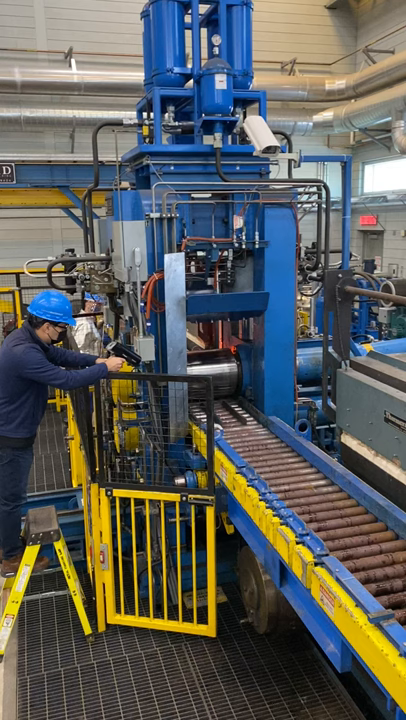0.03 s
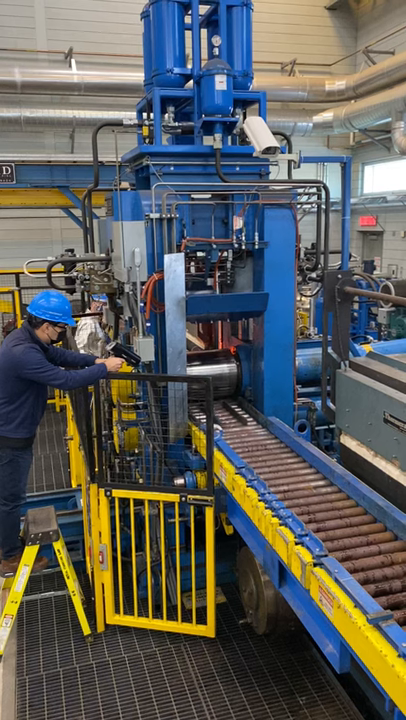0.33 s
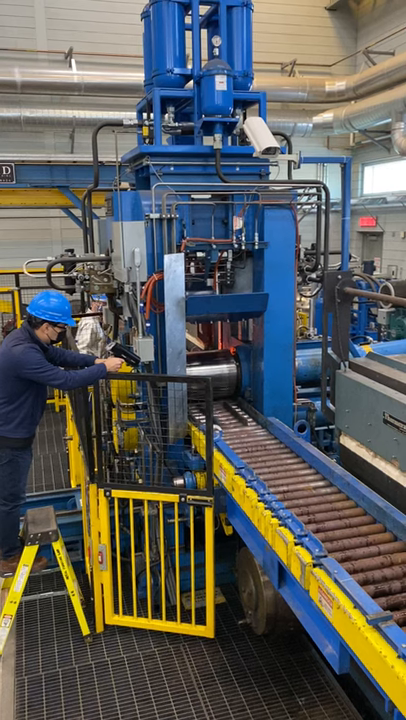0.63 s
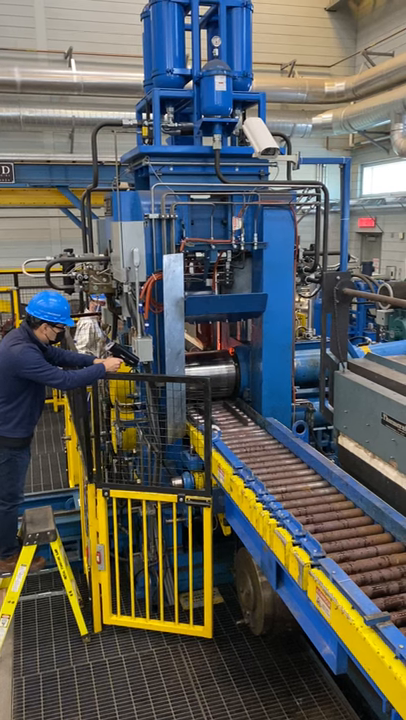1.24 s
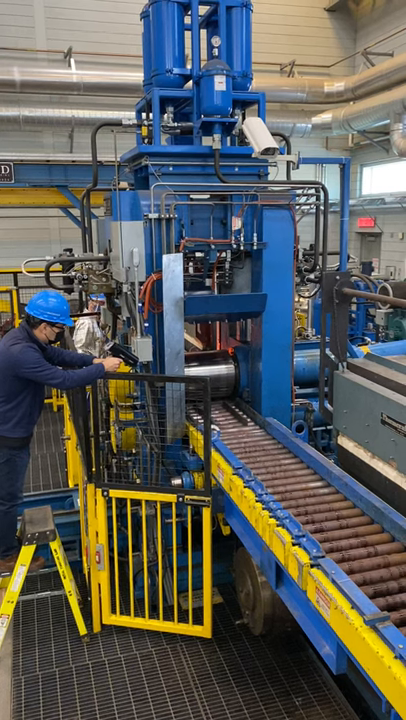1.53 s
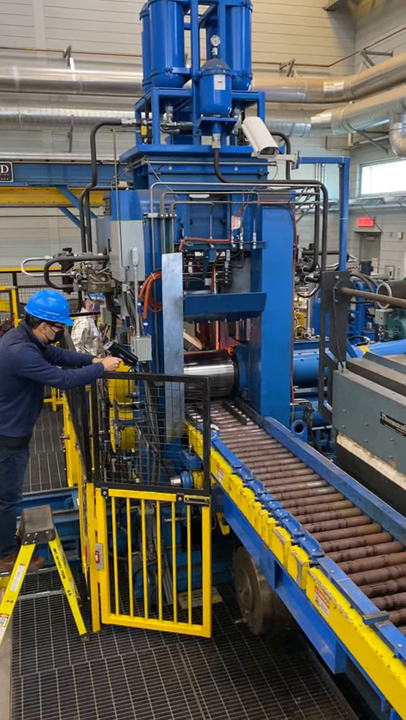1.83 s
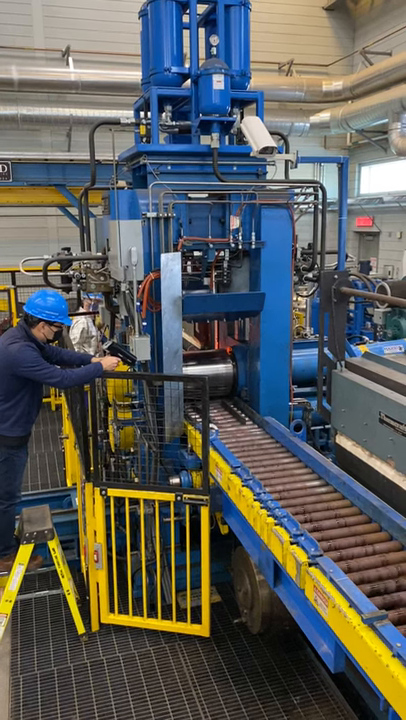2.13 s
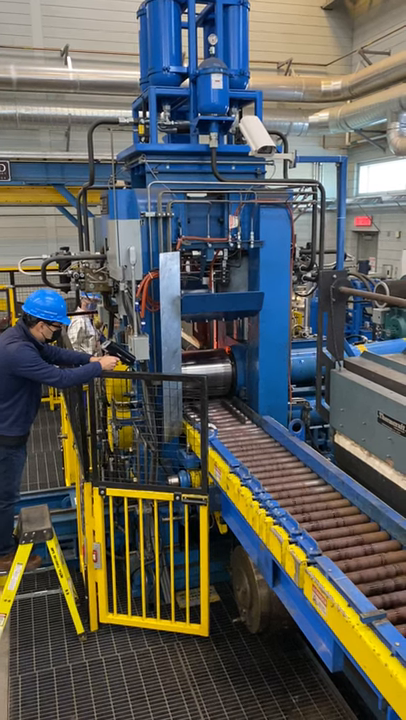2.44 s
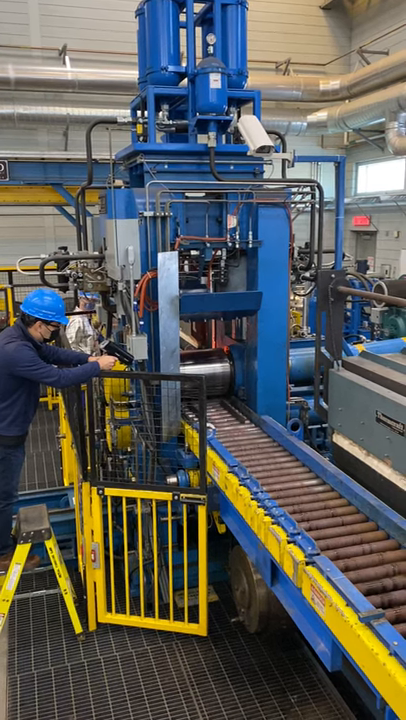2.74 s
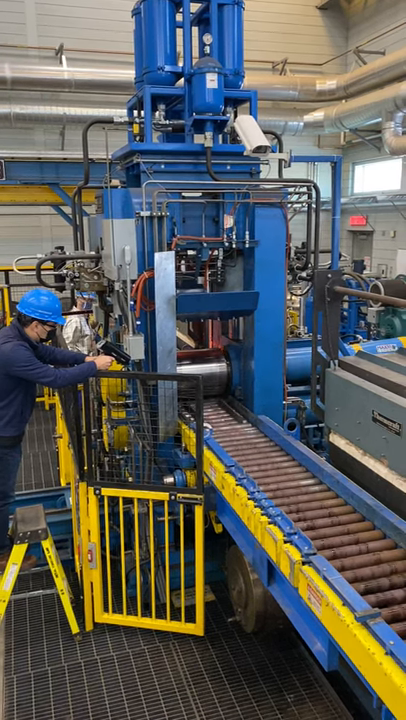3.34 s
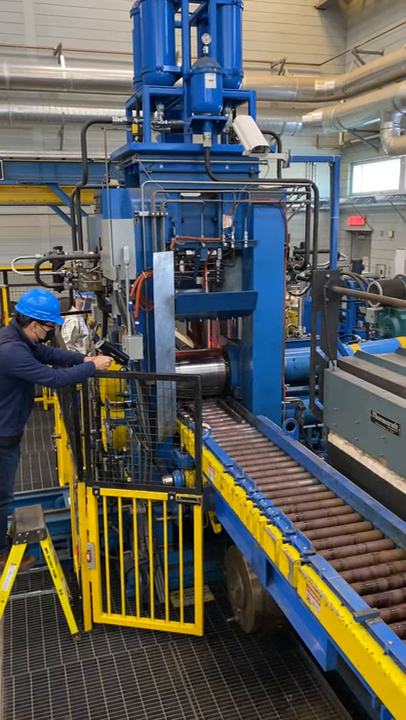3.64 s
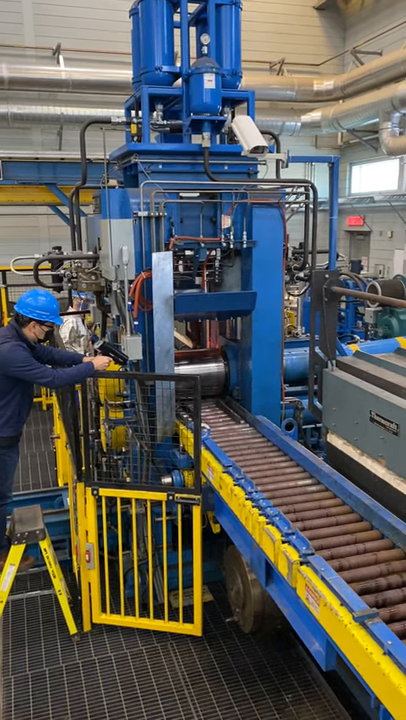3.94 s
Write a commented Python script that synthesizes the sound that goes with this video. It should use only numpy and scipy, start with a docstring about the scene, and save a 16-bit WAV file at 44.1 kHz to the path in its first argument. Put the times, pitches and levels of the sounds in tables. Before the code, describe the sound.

A rolling mill roars and rumbles in a large hall, with dull thuds and faint squeals.

```python
"""In a large steel hall, a rolling mill runs over the steady roar of the plant and a hiss of spray.
A hydraulic pump whines and motors hum. The rolls rumble and the roller table rattles, both swelling
and easing with the mill's effort. The steel strip scrapes faintly in its guides, rubbing steel gives
some raspy squeals, and the loaded frame thuds dully. Two closely spaced microphones listen."""
import sys
import numpy as np
from scipy import signal
from scipy.fft import rfft, irfft
from scipy.io import wavfile

SR = 44100
rng = np.random.default_rng(int(sys.argv[2]) if len(sys.argv) > 2 else 0)


def wav_record(signal):
    """Record a signal, one row per channel, as 16-bit PCM in the file named by sys.argv[1]."""
    frames = np.transpose(np.atleast_2d(signal))
    bounded = np.clip(frames, -1, 1)
    # unit amplitude maps onto the largest positive 16-bit level
    quanta = np.round(bounded * 32767).astype(np.int16)
    wavfile.write(sys.argv[1], SR, quanta)


N = 176400
TIME, FREQS = np.arange(N) / SR, np.maximum(np.arange(N // 2 + 1) * SR / N, 1)
CENTRE = [[1], [0]]   # sounds have two rows: what left and right share, and how they differ

# How hard the mill works. Each row: time in seconds, level in dB.
MILL_EFFORT = [(0, -22.5), (.8, -10), (1.35, -14.5), (1.7, -6.5), (2.0, -3), (2.2, -1), (2.55, -1.4),
               (2.92, 0), (3.3, -3), (3.7, -6.5), (4, -9.5)]
# How the two microphones compare. Each row: frequency in Hz, likeness from 0 to 1,
# how far left is ahead in radians, how much louder left is in dB.
MIC_PAIR = [(100, 0.95, -0.5, -6), (250, 0.95, -0.33, 0.5), (500, 0.84, 0.25, -0.6), (1070, 0.65, 0.22, 0),
            (1940, 1, 0.52, -0.7), (3080, 0.35, 0.8, -0.3), (3930, 0.85, -0.1, -3.5),
            (4220, 0.97, 1.18, -2), (4940, 0.9, 0.42, 0), (6825, 1, 2.5, 1), (10040, 1, 6, 0.5),
            (13100, 1, 8.5, -0.5), (15600, 0.8, 11.5, 1)]


def from_db(db):
    """Turn decibels into a number to multiply by."""
    return 10 ** (np.asarray(db) / 20)


def rms_one(x):
    """Scale a signal so that its average strength (rms) is 1."""
    return x / np.sqrt(np.mean(np.abs(x) ** 2) + 1e-20)


def in_time(rows, lag_s=0):
    """Join rows of time and value into a curve."""
    return np.interp(TIME - lag_s, *np.transpose(rows))


def at_hz(rows, hz, column=1):
    """Read a table between its frequencies, with octaves evenly spaced."""
    rows = np.array(rows)
    return np.interp(np.log(hz), np.log(rows[:, 0]), rows[:, column])


def drift(rate_hz):
    """A smooth random wobble, about 1 in size."""
    step, warm_up = 40, 2000
    memory = np.exp(-2 * np.pi * step * rate_hz / SR)
    noise = rng.standard_normal(N // step + warm_up + 2)
    slow = signal.lfilter([1], [1, -2 * memory, memory * memory], noise)[warm_up:]
    return np.interp(np.arange(N) / step, np.arange(len(slow)), rms_one(slow))


def narrow_noise(phase, width_hz):
    """Noise gathered closely around one pitch."""
    return drift(width_hz) * np.cos(phase) + drift(width_hz) * np.sin(phase)


def roar(spectrum, level_db, flicker_db, flicker_hz):
    """Two noises cut into octave bands; each band flickers around level_db(its frequency)."""
    noise = rfft(rng.standard_normal((2, N))) * from_db(at_hz(spectrum, FREQS)) * np.sqrt(SR / 2)
    octave = np.clip(np.round(np.log2(FREQS)), 6, 13)
    out, together = 0, drift(flicker_hz)
    for k in np.unique(octave):
        flicker = flicker_db * (drift(flicker_hz) + .5 * together)
        out = out + irfft(noise * (octave == k), N) * from_db(level_db(2 ** k) + flicker)
    return out


def hall(x, fade_s=1.2):
    """The hall's echo: two tails of noise that fall 60 dB in fade_s."""
    tails = rng.standard_normal((2, SR)) * from_db(-60 * TIME[:SR] / fade_s)
    return signal.fftconvolve(x[None], rms_one(tails) / np.sqrt(SR), axes=1)[:, :N]


def tone(hz, db, waver_db, scattered_share=0.42):
    """A machine tone: partly pure, partly scattered by the hall."""
    phase = 2 * np.pi * (hz * TIME + rng.random())
    waves = np.array([np.sin(phase), np.sin(phase + 2 * np.pi * rng.random())])
    pure = np.sqrt(2 * (1 - scattered_share)) * waves
    scattered = np.sqrt(scattered_share) * np.array([narrow_noise(phase, 7.9) for _ in range(2)])
    return from_db(db) * rms_one((pure + scattered) * from_db(waver_db * drift(2.3)))


def plant():
    """The plant gives a steady, low roar."""
    # The roar's tone colour. Each row: frequency in Hz, level in dB per Hz.
    spectrum = [(22, -90), (36, -70), (48, -55), (62, -52.5), (82, -46.5), (135, -47.3), (220, -49),
                (330, -48.5), (520, -53.5), (850, -55.5), (1250, -60), (1750, -61.5), (2300, -62),
                (3200, -65.5), (4500, -72), (8000, -86), (16000, -100)]
    return roar(spectrum, lambda hz: 0, flicker_db=0.67, flicker_hz=17)


def spray():
    """The spray hisses, a little louder midway."""
    # The hiss's tone colour. Each row: frequency in Hz, base level in dB per Hz.
    spectrum = [(1500, -84), (3500, -72), (5000, -69.5), (7000, -75), (9500, -78), (12500, -81.5),
                (15500, -84)]
    # The hiss's swell. Each row: time in seconds, added level in dB.
    swell = [(0, -0.5), (1.4, 0), (2.1, 1.5), (2.43, 1.5), (2.53, 3.5), (2.68, 1.5), (2.95, 2.8), (3.4, .5),
             (4, -.5)]
    return roar(spectrum, lambda hz: in_time(swell), flicker_db=0.74, flicker_hz=20)


def pump(pitch_hz=269.1):
    """The hydraulic pump whines at whole multiples of one pitch."""
    # The whine's tones. Each row: multiple of the pitch, level in dB.
    harmonics = [(1, -38), (2, -41), (3, -40), (4, -42.5), (5, -47), (6, -45), (7, -45), (8, -44.5),
                 (9, -42.8), (10, -43.5), (11, -50), (12, -53), (13, -49.5)]
    return sum(tone(pitch_hz * multiple, db, waver_db=1) for multiple, db in harmonics)


def motors(hum_hz=175):
    """Motors and gears hold steady tones, while one deep hum comes and goes."""
    # The steady tones. Each row: pitch in Hz, level in dB.
    drive_tones = [(86, -42), (348, -38), (594, -41), (1310, -46), (2021, -48.5), (2078, -48), (2340, -42),
                   (2753, -44.5)]
    # The deep hum. Each row: time in seconds, level in dB.
    hum_level = [(.2, -24), (.3, -31), (.8, -28), (1.0, -42), (1.25, -25), (1.55, -25.5), (1.7, -31),
                 (1.8, -25.5), (2.2, -24), (2.7, -28.5), (4, -31)]
    loudness = np.sqrt(2) * from_db(in_time(hum_level) + 1.2 * drift(5.8))
    hum = loudness * np.sin(2 * np.pi * hum_hz * TIME + 0.52 * drift(2.8))
    return sum(tone(hz, db, waver_db=1.5) for hz, db in drive_tones) + hum * CENTRE


def rolls(throb_hz=8.4, throb_peak_s=2.52):
    """The rumble swells with effort, bass first, treble last. The turning rolls make its low part throb."""
    # The rumble at full effort. Each row: frequency in Hz, level in dB per Hz.
    spectrum = [(25, -88), (55, -66), (110, -48), (220, -41.5), (340, -43.5), (520, -48), (950, -53),
                (1500, -57), (2200, -65.5), (3000, -74.5), (5000, -71), (15000, -92.5)]
    # The swell of the bass. Each row: time in seconds, added level in dB.
    bass_swell = [(0, -18), (1.45, -11), (1.72, -7), (1.83, -1), (2.05, -7), (2.2, -3), (2.4, -1.5),
                  (2.9, -2.5), (3.3, -6), (4, -8)]
    throb_db = 0.44 * np.cos(2 * np.pi * throb_hz * (TIME - throb_peak_s))

    def level_db(hz):
        if hz > 600:
            return in_time(MILL_EFFORT, lag_s=0.07)
        return throb_db + in_time(bass_swell if hz < 180 else MILL_EFFORT)
    return roar(spectrum, level_db, flicker_db=0.56, flicker_hz=14)


def roller_table(knocks_per_s=70, pitches=20, ring_cycles=27, db_per_octave=0.5):
    """Random knocks of the rollers ring briefly in the steel frame and on through the hall."""
    sizes = from_db(-1.5 * np.minimum(rng.exponential(1, N), 4)) * rng.choice([-1, 1], N)
    knocks = sizes * (rng.random(N) < knocks_per_s / SR)
    which_pitch = rng.integers(0, pitches, N)
    rattle = 0
    for k, hz in enumerate(np.geomspace(200, 3200, pitches)):
        decay, angle = from_db(-60 * hz / (ring_cycles * SR)), 2 * np.pi * hz / SR
        hits = knocks * (which_pitch == k) + 1e-18
        ring = signal.lfilter([0, np.sin(angle)], [1, -2 * decay * np.cos(angle), decay * decay], hits)
        rattle = rattle + from_db(db_per_octave * np.log2(hz)) * ring
    rattle = from_db(-31 + in_time(MILL_EFFORT)) * rms_one(rattle)
    return rattle * CENTRE + from_db(-9) * hall(rattle)


def scrape(pitch_hz=2378):
    """The strip keeps scraping faintly in its guides."""
    chatter = rms_one(from_db(6 * drift(22)))
    return from_db(-43.5) * chatter * narrow_noise(2 * np.pi * pitch_hz * TIME, width_hz=69)


def squeals(rough_hz=55, fade_s=.025):
    """Steel rubs on steel in raspy whistles, most of them sinking in pitch."""
    # The squeals. Each row: start and length in seconds, first and last pitch in Hz,
    # level in dB, share of rasp from 0 to 1.
    rubs = [(1.655, 0.3, 2433, 2380, -32, 0.5), (1.726, 0.28, 2060, 2070, -34.5, .95),
            (2.96, 0.052, 2690, 2690, -24.5, .2), (3.47, 0.19, 2400, 2350, -32, 0.7),
            (3.603, 0.17, 2330, 2355, -30, 0.2), (3.777, .21, 2325, 2320, -34, .9),
            (3.62, .19, 2200, 1907, -29.5, .4), (3.801, 0.138, 2060, 2023, -27, 0.6)]
    out = 0
    for start, length, first_hz, last_hz, db, rasp in rubs:
        hz = np.interp(TIME, [start, start + length], [first_hz, last_hz]) + rough_hz * drift(119)
        phase = 2 * np.pi * np.cumsum(hz) / SR
        whistle = np.sqrt(2 * (1 - rasp)) * np.sin(phase) + np.sqrt(rasp) * narrow_noise(phase, 170)
        fade = np.clip(np.minimum(TIME - start, start + length - TIME) / fade_s, 0, 1)
        out = out + fade * from_db(db + 2 * drift(32)) * whistle
    return out


def thuds(rise_s=0.02, waver_hz=11.87):
    """Heavy, soft blows swell and die in the loaded frame that holds the rolls."""
    # The thuds. Each row: start in seconds, pitch in Hz, level in dB.
    blows = [(1.8, 88, -15), (1.885, 92, -19), (1.955, 100, -16), (1.965, 255, -17), (2.115, 110, -18),
             (2.155, 215, -15), (2.24, 178, -16), (2.385, 290, -21.5), (2.505, 320, -18), (2.88, 220, -16),
             (3.01, 125, -15)]
    out = 0
    for start, hz, db in blows:
        age = np.maximum(TIME - start, 0) / rise_s
        swell = (age * np.exp(1 - age)) ** 2
        phase = 2 * np.pi * np.cumsum(hz + waver_hz * drift(29.5)) / SR
        out = out + from_db(db) * swell * np.sin(phase)
    return out * CENTRE


def microphones(sound):
    """Make left and right: as alike as the hall leaves them, a little apart in timing and level."""
    alike = at_hz(MIC_PAIR, FREQS)
    shared, side = rfft(sound) * np.sqrt([(1 + alike) / 2, (1 - alike) / 2])
    pair = np.array(MIC_PAIR)
    left_lead = np.interp(FREQS, pair[:, 0], pair[:, 2])
    half_shift = np.exp(.5j * left_lead) * from_db(at_hz(MIC_PAIR, FREQS, column=3) / 2)
    return irfft([(shared + side) * half_shift, (shared - side) / half_shift], N)


def scene():
    """All the sounds of the mill reach the two microphones."""
    machines = plant() + spray() + rolls() + thuds() + pump() + motors() + roller_table()
    rubbing = scrape() + squeals()
    return microphones(machines + rubbing * CENTRE + from_db(-7) * hall(rubbing))


def record(dry):
    """Centre the bass, start the sound abruptly and cut the highest treble."""
    mono_below_hz, start_s, cutoff_hz = 340, 0.083, 15700
    shared, side = (dry[0] + dry[1]) / 2, (dry[0] - dry[1]) / 2
    side = irfft(rfft(side) / np.sqrt(1 + (mono_below_hz / FREQS) ** 8), N)
    fade_in = np.clip((TIME - start_s) / .002, 0, 1)
    treble_cut = signal.ellip(12, .1, 90, cutoff_hz, fs=SR, output="sos")
    return signal.sosfilt(treble_cut, np.array([shared + side, shared - side]) * fade_in)


dry = scene()
out = record(dry)
wav_record(out)
```